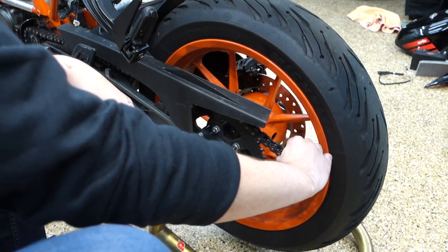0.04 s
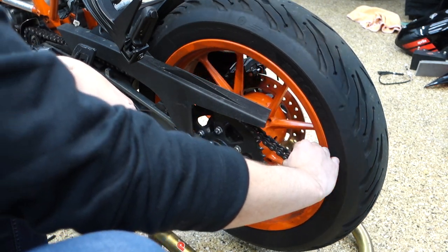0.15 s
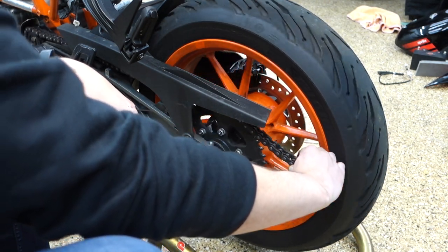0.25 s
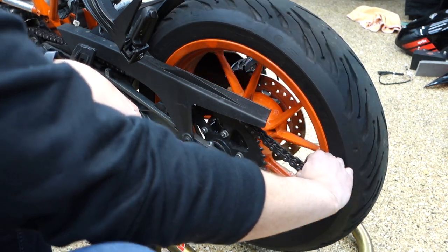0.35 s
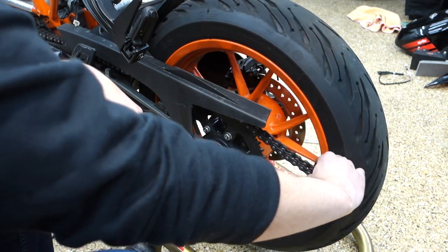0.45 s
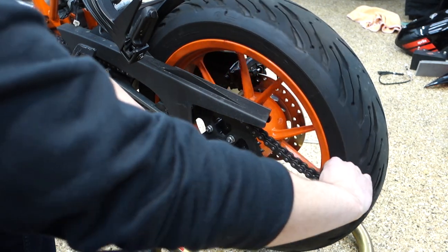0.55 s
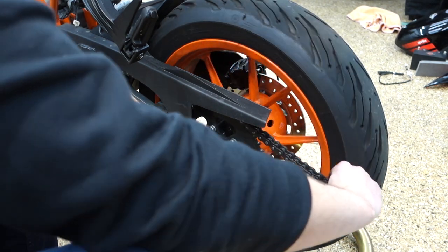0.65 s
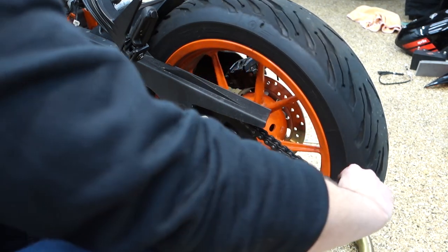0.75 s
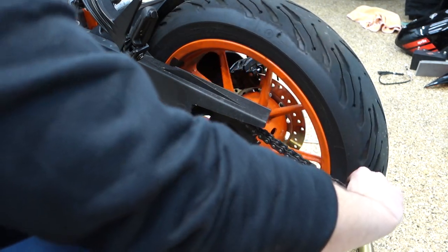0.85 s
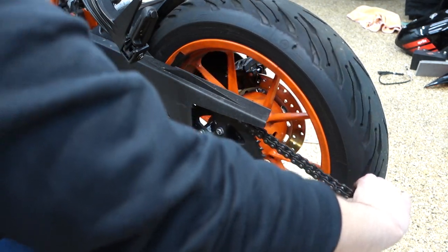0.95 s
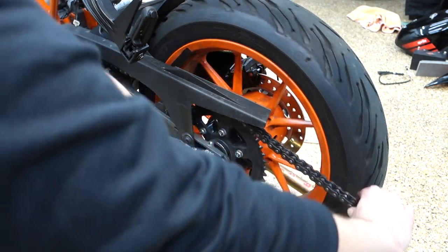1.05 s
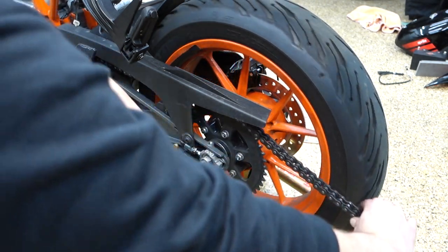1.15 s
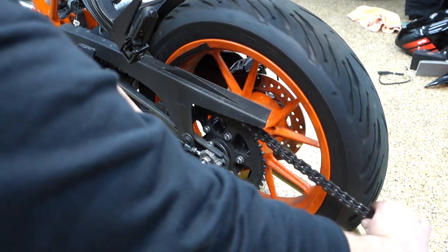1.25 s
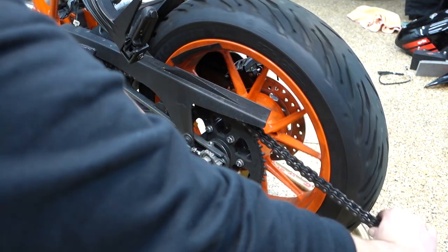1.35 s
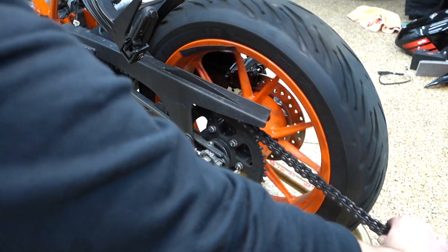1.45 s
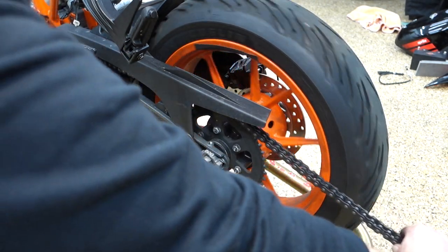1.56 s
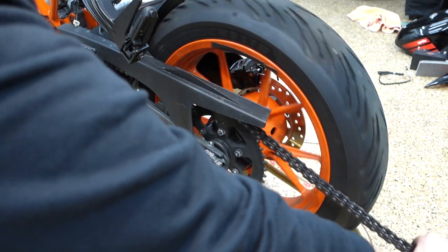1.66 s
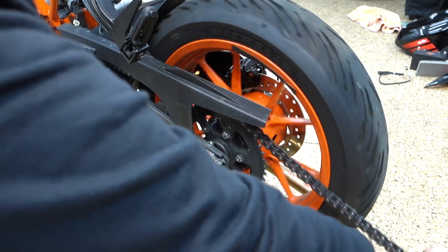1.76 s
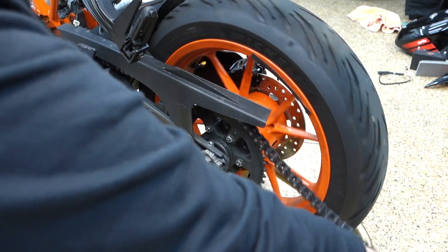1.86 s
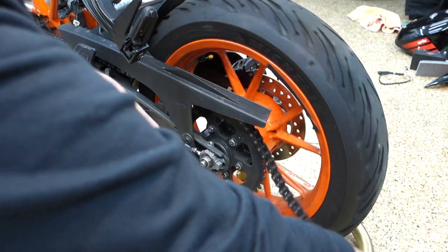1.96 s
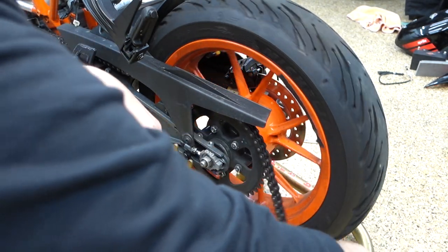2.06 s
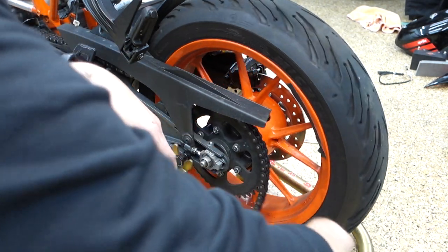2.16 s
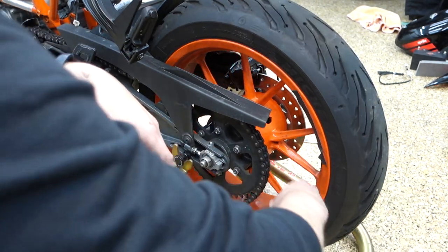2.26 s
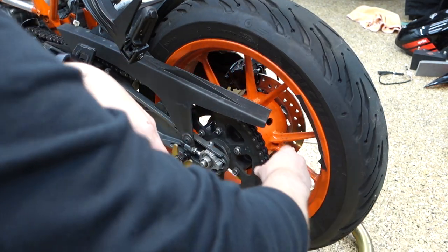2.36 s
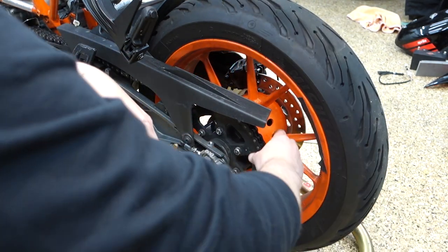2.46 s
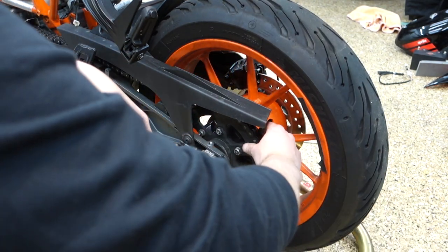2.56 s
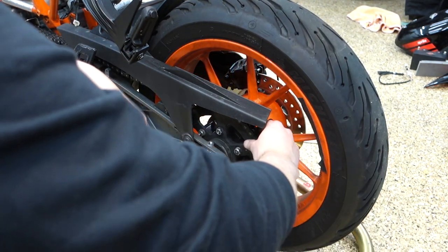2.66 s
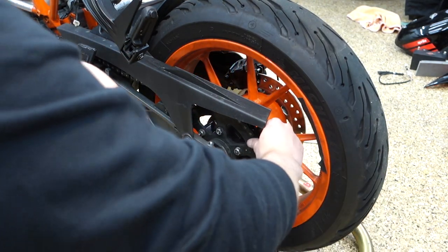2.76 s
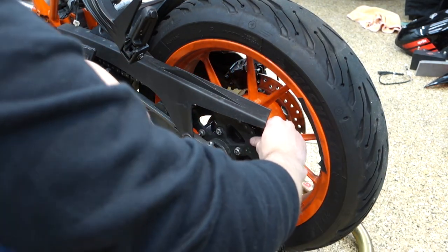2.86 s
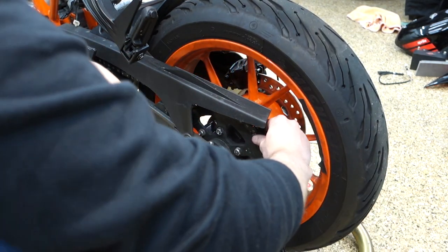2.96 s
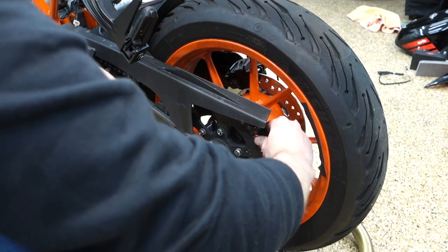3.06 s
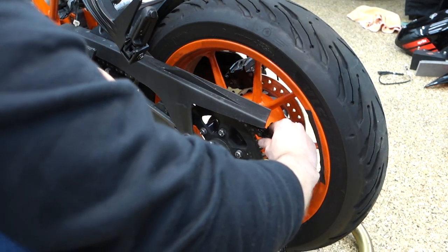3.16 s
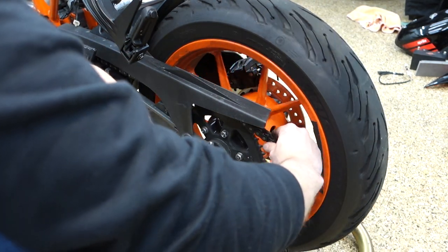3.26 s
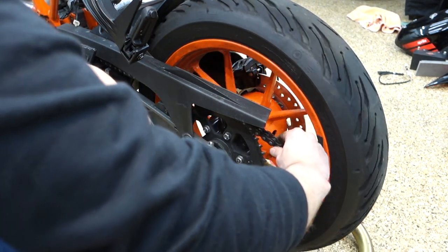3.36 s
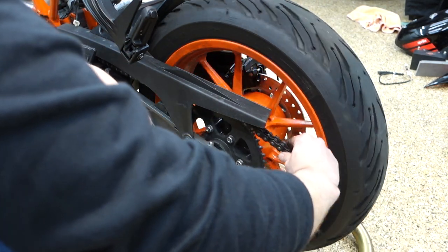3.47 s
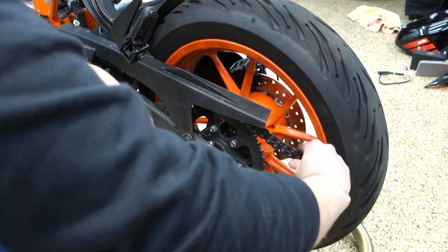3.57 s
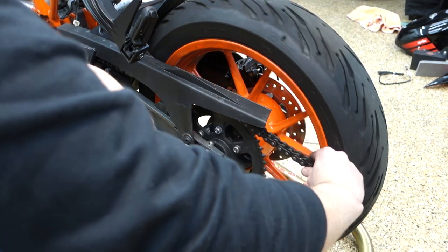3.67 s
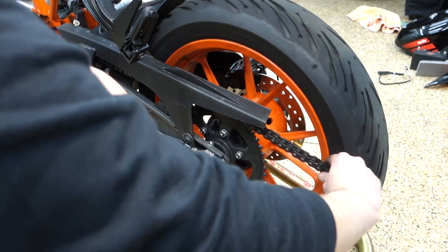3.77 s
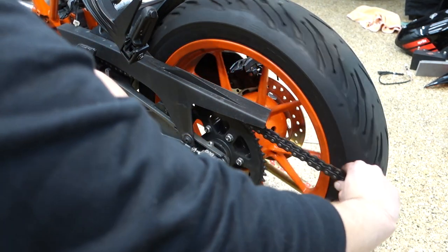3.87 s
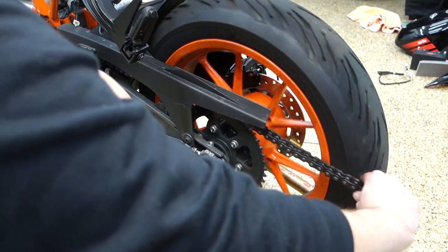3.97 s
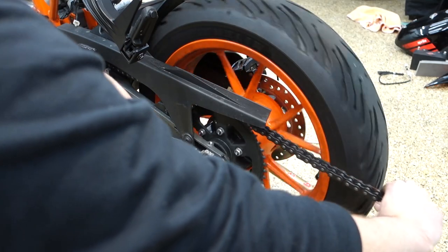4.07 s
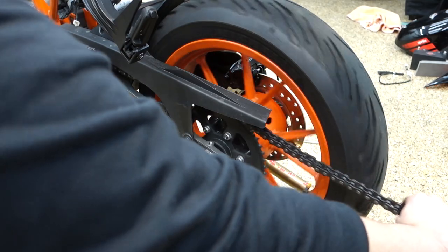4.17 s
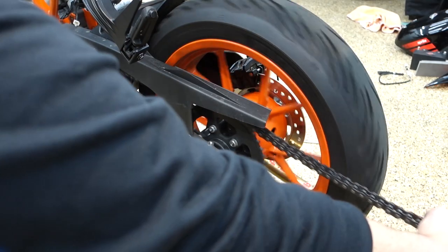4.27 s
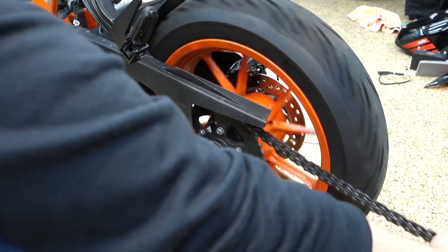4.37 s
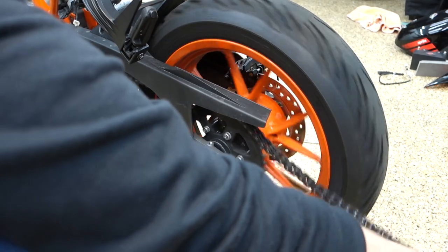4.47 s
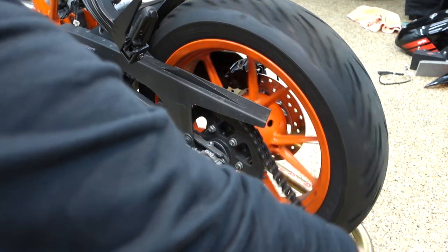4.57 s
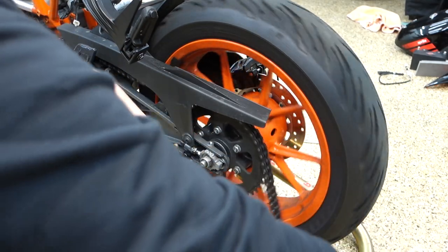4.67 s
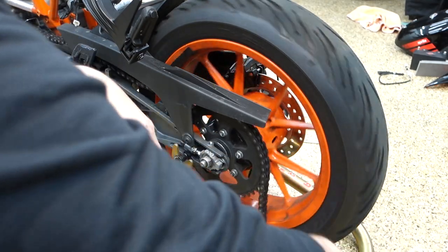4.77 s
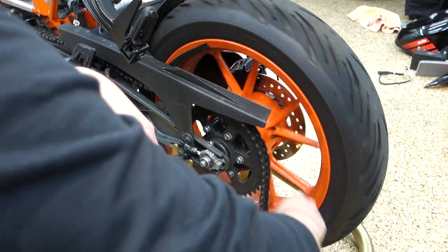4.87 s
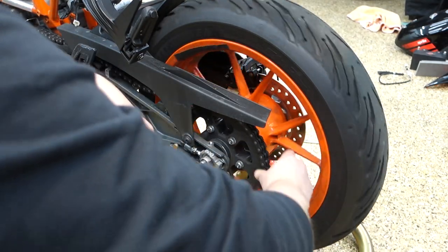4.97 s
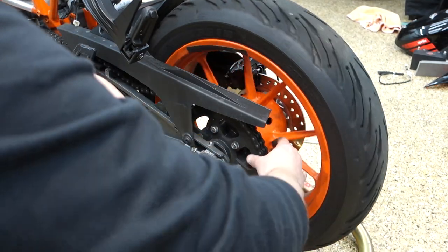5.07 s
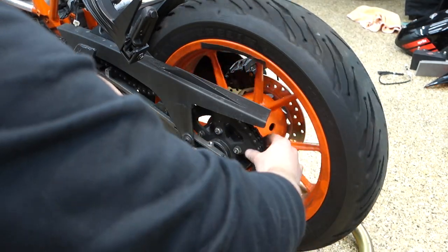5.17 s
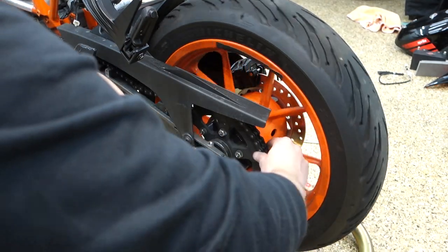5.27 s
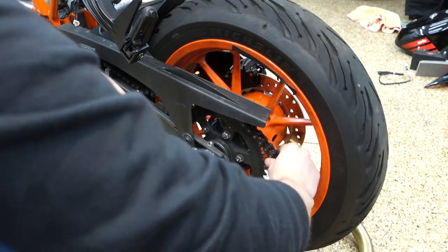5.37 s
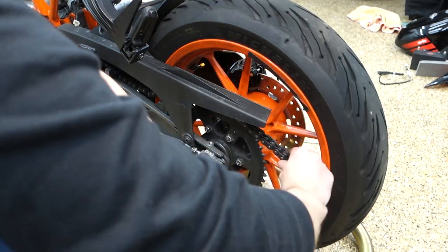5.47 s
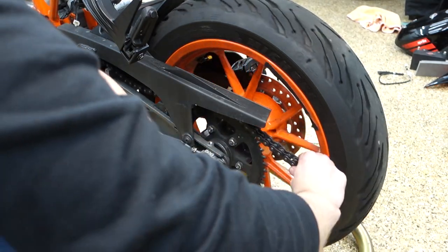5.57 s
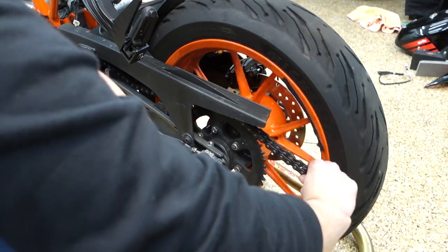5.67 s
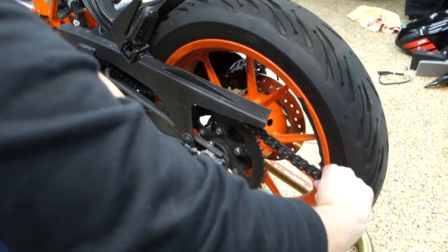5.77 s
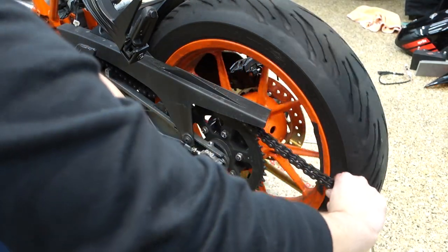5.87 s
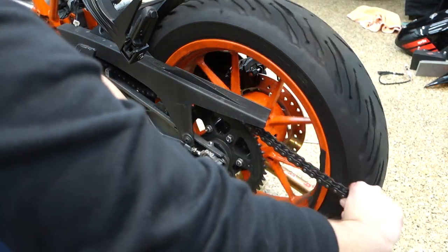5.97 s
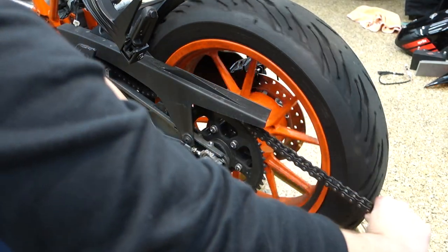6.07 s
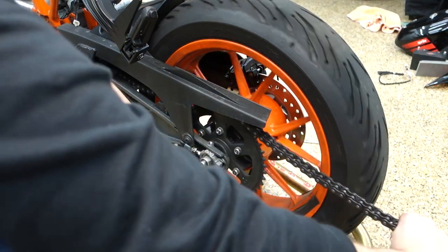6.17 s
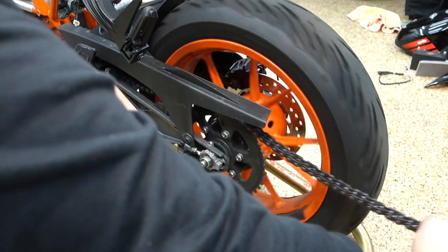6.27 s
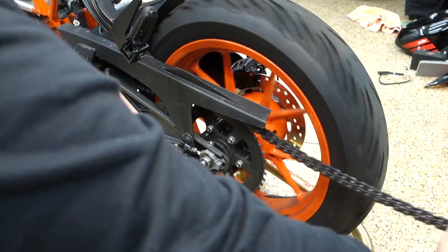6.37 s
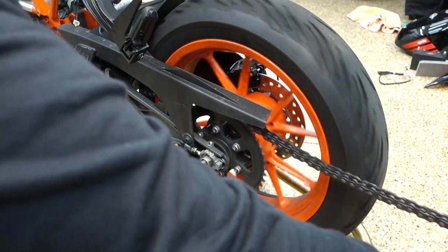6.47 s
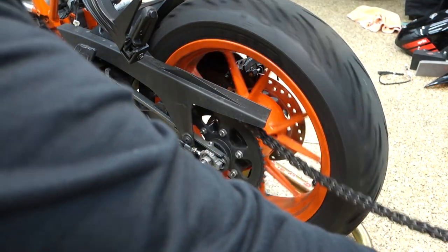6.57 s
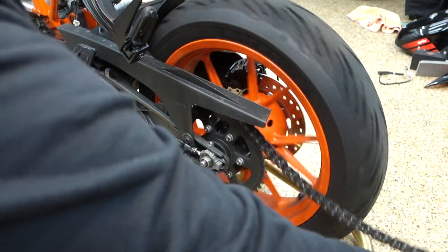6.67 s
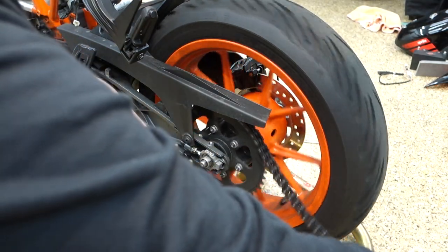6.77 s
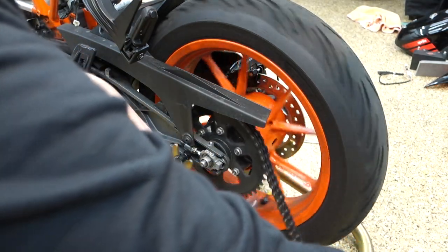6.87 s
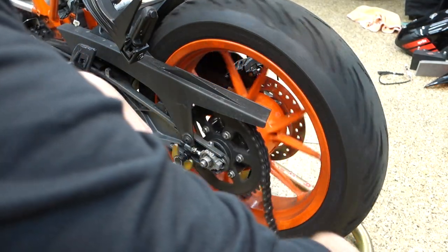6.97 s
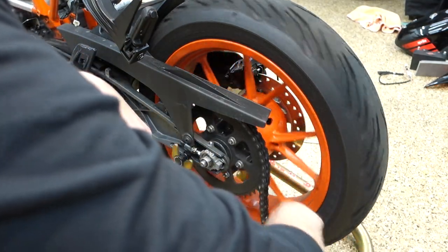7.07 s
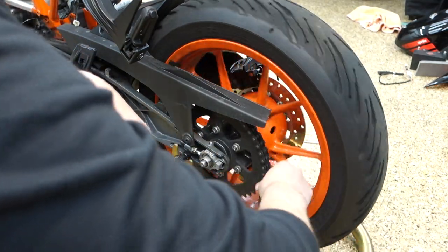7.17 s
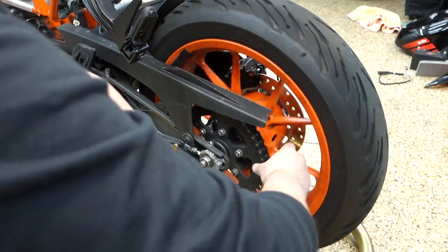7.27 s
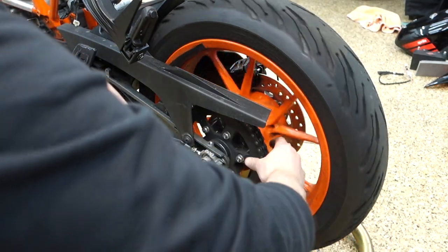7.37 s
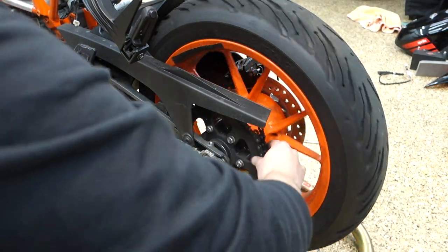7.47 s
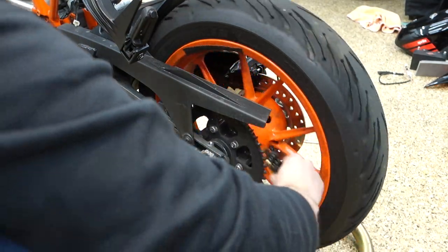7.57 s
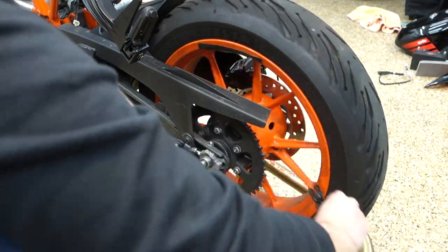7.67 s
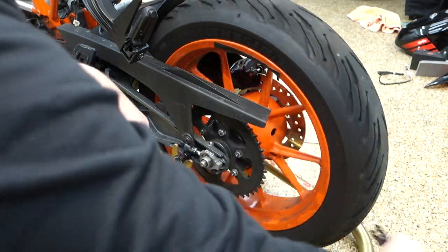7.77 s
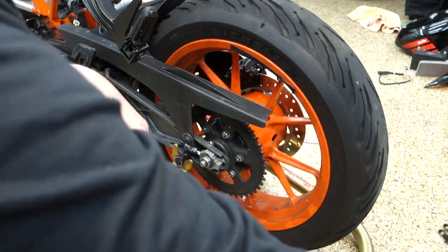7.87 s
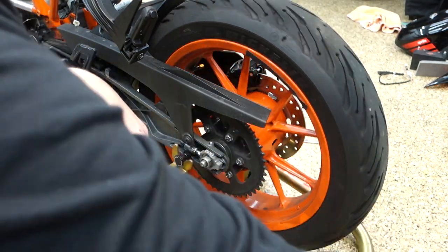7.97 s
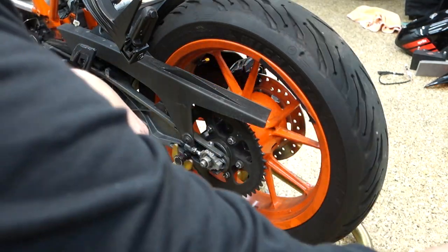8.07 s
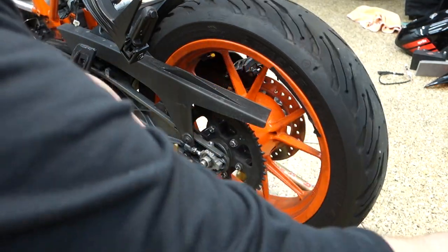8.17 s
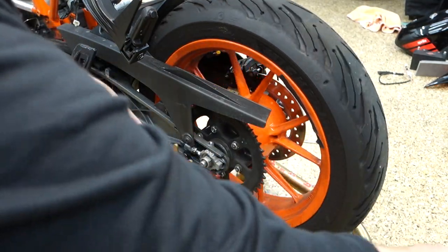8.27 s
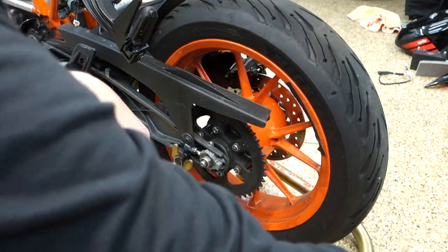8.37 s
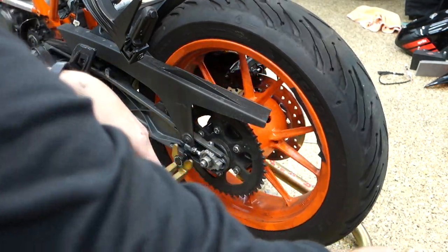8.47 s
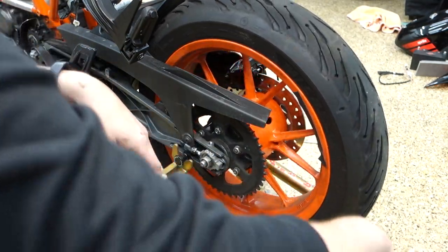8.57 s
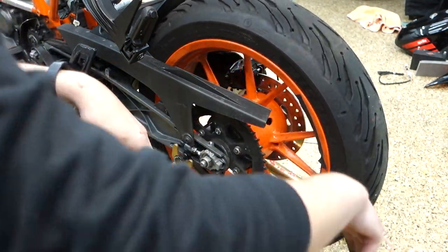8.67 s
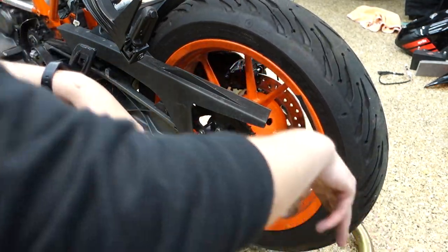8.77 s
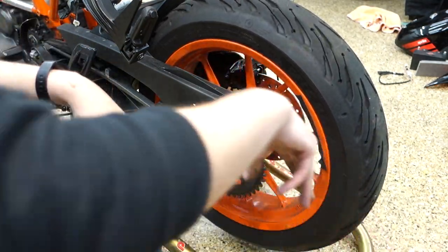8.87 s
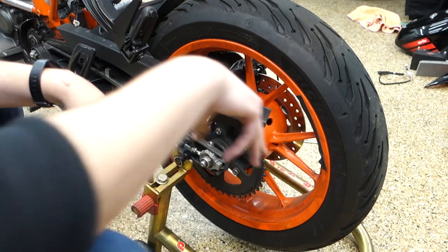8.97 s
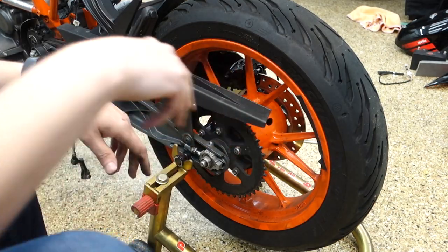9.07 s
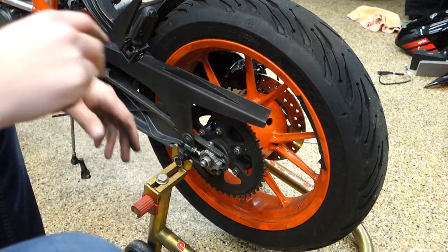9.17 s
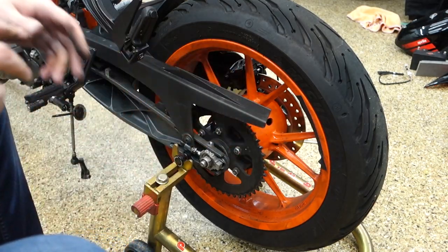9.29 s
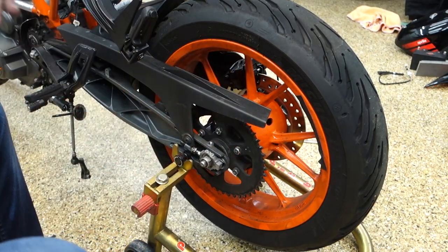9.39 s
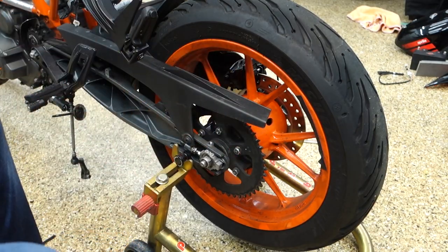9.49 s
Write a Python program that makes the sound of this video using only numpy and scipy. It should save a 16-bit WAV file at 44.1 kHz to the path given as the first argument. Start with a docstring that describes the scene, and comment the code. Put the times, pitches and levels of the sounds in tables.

```python
"""Garage: a loose motorcycle chain is pulled hand over hand off the rear sprocket.
Rollers rumble over the swingarm guide and links clink: random impacts excite decaying steel modes.
Slack loops hit the steel paddock stand or the sprocket, or spill onto concrete: tumbling blows, each
set to band levels. A fan hums as narrow noise bands over hiss; decaying noise makes the hard-walled room."""
import sys
import numpy as np
from scipy import signal
from scipy.fft import rfft, irfft, next_fast_len
from scipy.io import wavfile

SR = 44100
rng = np.random.default_rng(int(sys.argv[2]) if len(sys.argv) > 2 else 0)


def unload_wav(signal):
    """Save mono or channel-first audio to the path in sys.argv[1] as 16-bit WAV at rate SR, clipped to [-1, 1]."""
    wavfile.write(
        sys.argv[1],
        SR,
        np.round(np.clip(np.atleast_2d(signal).T, -1, 1) * 32767).astype(np.int16),
    )


N = 420273

# Loops landing on the sprocket. Each row: start in seconds, length of the clatter in seconds,
# then thud, clack, clink and sizzle levels in dB.
SPROCKET_HITS = [(6.136, 0.092, -38, -29.5, -24, -26.5), (6.218, 0.081, -37.5, -30.5, -24, -27)]
# Modes of links and sprocket teeth. Each row: frequency in Hz, relative level in dB, t60 in seconds.
LINK = [(1547, 2, 0.095), (3410, -10, 0.068), (4787, 15.5, 0.027), (4770, -9, 0.1), (5130, -27.5, 0.081),
        (6490, -9, 0.37), (6470, -5, 0.12), (6960, -2, 0.22), (7300, -13.5, 0.36), (8170, -3, 0.1),
        (8900, -12, 0.22), (10380, 1.5, 0.092), (10520, -33, 0.16), (12050, -3, 0.19), (13850, -7, 0.12),
        (14270, -2, 0.15)]
# Colour of a link contact. Each row: frequency in Hz, relative gain in dB.
CONTACT = [(30, -33), (130, -24.5), (200, -14), (290, 0), (450, 2.5), (700, 5), (1200, 14), (2500, 7.5),
           (3500, -3), (4900, -7.5), (6500, 1), (9000, 4.5), (15500, 6.5)]


def amp(db):
    """Decibels to gain."""
    return np.exp(np.asarray(db) * (np.log(10) / 20))


def unit(x):
    """Each channel at rms 1."""
    return x / np.sqrt(np.mean(x ** 2, axis=-1, keepdims=True) + 1e-20)


def along(points, hz):
    """Interpolate (Hz, value) points on a log frequency axis."""
    f, v = np.transpose(points)
    return np.interp(np.log(hz + 1), np.log(f + 1), v)


def seconds(length_s):
    """A time axis."""
    return np.arange(int(length_s * SR)) / SR


def filtered(x, response):
    """x through a zero-phase response of frequency."""
    size = next_fast_len(x.shape[-1] + 2048, real=True)
    gain = response(np.fft.rfftfreq(size, 1 / SR)).astype(np.float32)
    return irfft(rfft(x.astype(np.float32), size) * gain, size)[..., :x.shape[-1]]


def through(x, answer):
    """x convolved with an impulse response of one or two channels."""
    size = x.shape[-1]
    x = np.atleast_2d(x).astype(np.float32)
    answer = answer[:, :size].astype(np.float32)
    return signal.fftconvolve(x, answer, axes=1)[:, :size]


def coloured(x, gain):
    """x through a causal minimum-phase filter with the given gain of frequency."""
    size = 4096
    cepstrum = irfft(np.log(gain(np.fft.rfftfreq(size, 1 / SR)) + 1e-9))
    cepstrum[1:size // 2] *= 2
    cepstrum[size // 2 + 1:] = 0
    return through(x, irfft(np.exp(rfft(cepstrum)))[None])


def add(track, start_s, x):
    """Mix x into the track at start_s."""
    part = track[:, max(round(start_s * SR), 0):][:, :x.shape[1]]
    part += x[:, :part.shape[1]]


def contacts(count, rate_hz, spread_db):
    """Impacts at random moments, of random sizes and signs."""
    hit = rng.random(count) < rate_hz / SR
    size = amp(spread_db * np.clip(rng.standard_normal(count), -2, 2))
    return hit * rng.choice([-1, 1], count) * size


def struck(blows, modes, ring_db, crack_t60_s, split, count=2):
    """Every blow cracks as fresh noise and rings small groups of close steel modes."""
    t = seconds(.25)
    hz, db, t60_s = np.repeat(modes, count, axis=0).T[:, :, None]
    hz = hz * (1 + split * rng.standard_normal(hz.shape))  # no two links or contact points are alike
    phase = 2 * np.pi * (hz * t + rng.random(hz.shape))
    decay = np.exp((-np.log(1000) / t60_s * t).astype(np.float32))
    partials = np.sin(phase.astype(np.float32)) * decay
    ring = (amp(db).T * rng.choice([-1, 1], (2, len(hz)))) @ partials
    energy = through(blows ** 2, amp(-60 * t / crack_t60_s)[None] ** 2)
    crack = np.sqrt(abs(energy)) * rng.standard_normal((2, len(blows)))
    return unit(crack) + amp(ring_db) * unit(through(blows, ring))


def room(wet_db):
    """Direct sound plus a fresh noise tail, whose treble dies first."""
    # Garage decay. Each row: frequency in Hz, t60 in seconds.
    decay_points = [(200, 0.49), (600, 0.54), (1500, 0.52), (4000, 0.57), (9000, 0.42), (15000, 0.33)]
    hz, t, z = signal.stft(rng.standard_normal((2, SR // 2)), SR, nperseg=256)
    decay = amp(-60 * t / along(decay_points, hz)[:, None])
    build_up = 1 - np.exp(-t / 0.0014)
    tail = signal.istft(z * decay * build_up, SR, nperseg=256)[1]
    answer = amp(wet_db) * tail / np.linalg.norm(tail[0])
    answer[:, 0] += 1
    return answer


def voiced(x, colour, levels_db, attack_s):
    """Give a blow its hardness: the strength of thud, clack, clink and sizzle over its attack."""
    # Edges of thud, clack, clink and sizzle in Hz.
    edges = np.array([150, 900, 3000, 8000, 16000])
    head = x[:, :int(attack_s * SR)]
    power = 2 * np.mean(abs(rfft(head) / head.shape[1]) ** 2, axis=0)
    hz = np.fft.rfftfreq(head.shape[1], 1 / SR)
    centres = np.sqrt(edges[1:] * edges[:-1])
    gain_db = np.zeros(len(levels_db))

    def gain(f):
        return amp(along(colour, f) + along(np.transpose([centres, gain_db]), f))

    for _ in range(2):  # a smooth tilt couples neighbouring bands
        have = np.histogram(hz, edges, weights=power * gain(hz) ** 2)[0]
        gain_db = gain_db + levels_db - 10 * np.log10(have + 1e-20)
    return coloured(x, gain)


def clatter(hits, steel, colour, rate_hz, first_db, wet_db, attack_s=.03, size=SR * 3 // 5, count=5):
    """One link lands first and its neighbours tumble after it; steel(blows) answers the blows."""
    out, t = np.zeros((2, N)), np.arange(size) / SR
    tails = [room(wet_db) for _ in hits[:count]]
    for k, (start_s, length_s, *levels_db) in enumerate(hits):
        fade = np.exp(-np.minimum((t / length_s) ** 2, 20))
        blows = contacts(size, rate_hz, spread_db=2.5) * fade
        blows[0] = amp(first_db)
        wet = through(steel(blows), tails[k % count])
        add(out, start_s, voiced(wet, colour, levels_db, attack_s))
    return out


def swell(t, start_s, end_s, rise_db_per_s, fall_db_per_s):
    """A gain that rises to 1 at start_s, holds until end_s and falls away."""
    rise_db = rise_db_per_s * np.maximum(start_s - t, 0)
    fall_db = fall_db_per_s * np.maximum(t - end_s, 0)
    return amp(-rise_db - fall_db)


def effort():
    """Rumble, jingle, scrape and boom gains: a pull takes up slack, gathers speed and is let go."""
    # Strokes of the hand. Each row: start and end in seconds, then levels in dB at the end of the
    # stroke of roller rumble, link jingle, scrape and swingarm boom.
    pulls = np.array([(0.41, 0.597, -55, -56, -65.5, -86), (0.777, 1.105, -59, -60.5, -69, -82),
                      (1.46, 2.057, -50, -50.5, -60, -82), (3.582, 3.765, -47.5, -47.5, -56, -78),
                      (4.013, 4.596, -45, -44.5, -52.5, -63), (4.85, 5.972, -44.5, -57.5, -64, -60),
                      (6.4, 6.76, -43.5, -53, -65, -55.5), (7.252, 8.334, -61, -57.5, -82, -90),
                      (9.4, 9.53, -57, -56, -60.5, -82.5)])
    gather_db_per_s, take_up_db_per_s, let_go_db_per_s = 3.5, 54, 51
    shake_db, shake_delay_s = -25, 0.0066
    t = np.arange(0, N / SR, .002)
    strokes = np.array([swell(t, start_s, end_s, take_up_db_per_s, let_go_db_per_s)
                        * amp(-gather_db_per_s * np.maximum(end_s - t, 0))
                        for start_s, end_s in pulls[:, :2]])
    levels = np.sqrt(amp(pulls[:, 2:]).T ** 2 @ strokes ** 2)
    # blows on the sprocket shake the guide
    shake = swell(t - shake_delay_s, SPROCKET_HITS[0][0], SPROCKET_HITS[-1][0],
                  rise_db_per_s=900, fall_db_per_s=101)
    levels[0] += amp(shake_db) * shake
    return [np.interp(np.arange(N) / SR, t, level) for level in levels]


def running_chain(rumble, jingle):
    """Rollers bump over the swingarm guide while the side plates jingle."""
    # Modes of guide and rollers. Each row: frequency in Hz, relative level in dB, t60 in seconds.
    guide_modes = [(530.5, -2, 0.1), (654.5, -1, 0.13), (901, -6.5, 0.49), (1137, 6.5, 0.086),
                   (1246, 6, 0.089), (1296, -11, 0.11), (1593, -2, 0.2), (2190, -14, 0.072),
                   (6590, 13, 0.041), (8350, 18.5, 0.062)]
    # Colours of rollers and side plates. Each row: frequency in Hz, relative gain in dB.
    rumble_colour = [(40, -45), (140, -41), (210, -32), (290, -6), (450, -6), (650, 4.5), (1200, 4),
                     (1600, 6.5), (2200, -0.5), (3000, -0.5), (5000, -9), (8000, -17), (15500, -14.5)]
    jingle_colour = [(1500, -55.5), (3500, -4), (4900, 4.5), (6000, -3), (9000, 0), (12000, -4.5),
                     (15500, -1.5)]
    bumps = contacts(N, rate_hz=160, spread_db=4.0)
    rollers = struck(bumps, guide_modes, ring_db=-7.5, crack_t60_s=0.017, split=0.0139)
    rollers = through(rollers, room(wet_db=-0.5))
    rollers = unit(filtered(rollers, lambda hz: amp(along(rumble_colour, hz))))
    taps = contacts(N, rate_hz=53, spread_db=9.0)
    plates = struck(taps, LINK, ring_db=-20.0, crack_t60_s=0.015, split=0.0037)
    plates = through(plates, room(wet_db=5.0))
    plates = unit(filtered(plates, lambda hz: amp(along(jingle_colour, hz))))
    return rumble * rollers + jingle * plates


def hollow_scrape(centre_hz, width_hz):
    """Fine slips through one broad, low resonance."""
    slips = through(contacts(N, rate_hz=560, spread_db=3), room(wet_db=3.0))

    def resonance(hz):
        detune = (hz ** 2 - centre_hz ** 2) / ((hz + 1) * width_hz)
        return 1 / (1 + detune ** 2) ** 2

    return unit(filtered(slips, resonance))


def link_knocks():
    """Evenly spaced links knock over the swingarm guide, their level moving linearly in dB."""
    # Runs of knocks. Each row: start in seconds, length in seconds, levels in dB at start and end.
    runs = [(4.008, .11, -40.5, -33.5), (5.805, .11, -34, -29.5), (6.413, 0.13, -31.5, -19)]
    # Bass, ring and sizzle of a knock in dB against the middle.
    knock_colour_db = [-22, -14, -22.5]
    period_s = .0461
    knocks = []
    for start_s, length_s, first_db, last_db in runs:
        for s in np.arange(0, length_s, period_s):
            level_db = first_db + (last_db - first_db) * s / length_s
            knocks.append((start_s + s, level_db, *knock_colour_db))
    return knocks


def clinks(play_s):
    """A link clinks or knocks and chatters briefly in the play of its pin."""
    # Single clinks and knocks of chain links. Each row: start in seconds, reference level in dB,
    # then bass (before thud_share), ring and sizzle in dB against the middle.
    singles = [(0.159, -49.5, -14, 4, -9), (0.3566, -39, -29, -12, -21), (0.4542, -34, -29, -9.5, -26),
               (0.9188, -43, -23, -10, -18), (1.1677, -43.5, -26, -7, -19), (1.285, -33, -26, -5.5, -10),
               (1.4476, -31.5, -35, -3, -27), (1.696, -40.5, -39, -4.5, 0), (1.7943, -33, -38, -7, -26),
               (1.8666, -33.5, -25.5, -3, -12), (1.957, -25.5, -33, -12, -42),
               (2.6081, -43.5, -6.5, -0.5, 5), (2.7805, -44.5, -22, -8, -9),
               (2.9157, -46.5, -20.5, -33, -19), (3.2793, -48, -18, 1.5, -15), (3.4165, -43, -28, -6, -23),
               (3.4651, -41, -26, 1, -11), (3.5435, -33.5, -25, -3.5, -20), (3.6037, -34, -33, -3, -16),
               (3.7033, -27, -33, -5, -16), (3.9249, -42.5, -19, 9.5, -6), (4.3579, -34, -21, 0, -21),
               (4.4025, -33, -51, 4.5, -30), (4.4604, -31.5, -19, 2.5, 5), (4.5196, -24.5, -36, -11, -32),
               (4.6115, -28, -41, -16, -25), (4.9157, -25.5, -38, -11, -18), (5.1297, -27, -28, -15.5, -32),
               (5.3115, -36.5, -18, -7, -23), (5.3649, -27.5, -24, -11, -25), (5.5463, -27, -29, -5, -19),
               (5.6154, -32.5, -19.5, -21, -34), (5.9977, -27, -22, -12, -21), (6.0393, -24, -23, -6, -22),
               (6.0922, -23, -12.5, -18, -20), (6.5631, -24.5, -22, -1, -14),
               (6.5986, -24.5, -24, -15, -10.5), (6.647, -25, -21, -11, -20), (6.6829, -22, -18, -15, -17),
               (6.7342, -28, -28, -6, -23), (7.5423, -44, -33, -11, -15), (8.1312, -30, -33, -11, -14.5),
               (9.361, -46.5, -37, 3, -20), (9.4915, -40, -18, 0.5, -11.5)]
    # Thud, clack, clink and sizzle of a link in dB against its reference level.
    blow_db = [-6, -11, -4.5, -7]
    thud_share = 0.67  # how far the thud follows the bass
    hits = []
    for start_s, db, bass_db, ring_db, sizzle_db in list(singles) + link_knocks():
        levels_db = db + np.add(blow_db, [thud_share * bass_db, 0, ring_db, sizzle_db])
        hits.append((start_s, play_s, *levels_db))

    def link(blows):
        return struck(blows, LINK, ring_db=-9.5, crack_t60_s=0.012, split=0.0122)

    return clatter(hits, link, CONTACT, rate_hz=1400, first_db=-5, wet_db=1.5,
                   attack_s=.015, size=SR // 3)


def stand_hits():
    """Slack loops swing against the tubular steel stand and ring its modes."""
    # Loops landing. Each row: start in seconds, length of the clatter in seconds, then thud, clack,
    # clink and sizzle levels in dB.
    hits = [(2.133, 0.041, -56, -30, -26.5, -23.5), (2.172, 0.11, -49, -32, -25, -28.5),
            (4.127, 0.048, -54.5, -23, -25, -34.5), (4.742, 0.043, -47, -20, -24, -40),
            (4.762, 0.12, -53.5, -25.5, -25.5, -38.5)]
    # Modes of the steel tube. Each row: frequency in Hz, relative level in dB, t60 in seconds.
    modes = [(1165, -9, 0.22), (1193, 4.5, 0.23), (1762, 9.5, 0.15), (2140, -13, 0.41), (2323, 2.5, 0.15),
             (2475, 0.5, 0.3), (2920, 7.5, 0.089), (3870, -15, .4), (3940, 3, 0.15), (4090, 2, 0.4),
             (4632, 0.5, 0.32), (4940, 5.5, 0.21), (5010, -6, 0.244), (6030, 4.5, 0.15), (6550, 0.5, 0.31),
             (6707, -14, 0.29), (7220, 5.5, 0.17), (8130, 9.5, 0.11), (8850, 13.5, 0.16), (11300, -3, 0.3),
             (12500, -7, 0.27), (13600, 13, 0.11), (14650, 0, 0.091), (14960, 16, 0.16), (15375, 0, 0.13)]
    # Each row: frequency in Hz, relative gain in dB.
    colour = [(30, -28), (150, -27.5), (300, -10.5), (800, 0), (1150, 4), (1400, -4.5), (2500, 4.5),
              (3400, 0.5), (4200, 3.5), (6800, 5.5), (8400, -6.5), (12800, -12.5), (14300, -6),
              (15500, -5.5)]

    def tube(blows):
        return struck(blows, modes, ring_db=-3, crack_t60_s=0.025, split=0.00807, count=6)

    return clatter(hits, tube, colour, rate_hz=900, first_db=6.5, wet_db=-3.0)


def sprocket_hits():
    """Slack loops swing against the sprocket, ringing teeth and links."""
    def teeth(blows):
        return struck(blows, LINK, ring_db=-2, crack_t60_s=0.035, split=0.00826, count=6)

    return clatter(SPROCKET_HITS, teeth, CONTACT, rate_hz=750, first_db=11.5, wet_db=-5.5)


def floor_spills():
    """Links spill onto concrete: short cracks, hardly any ring."""
    # Loops landing. Each row: start in seconds, length of the clatter in seconds, then thud, clack,
    # clink and sizzle levels in dB.
    hits = [(4.665, 0.12, -45, -41, -32.5, -28.5), (6.849, 0.016, -42, -40, -33, -31),
            (6.933, 0.05, -67, -30, -28, -26.5), (6.949, 0.025, -41, -35, -36.5, -32.5),
            (7.919, 0.029, -59.5, -47, -34.5, -34), (8.404, 0.0058, -67, -79, -34, -35),
            (8.422, 0.02, -59.9, -46.5, -34, -28), (8.458, 0.065, -48.5, -38, -31.5, -37.5)]

    def concrete(blows):
        return struck(blows, LINK, ring_db=-36, crack_t60_s=0.0056, split=0.02)

    return clatter(hits, concrete, CONTACT, rate_hz=550, first_db=2, wet_db=2.0)


def singing_steel():
    """A light touch leaves a freely hanging steel part ringing in pure partials that swell, then die."""
    # Partials. Each row: frequency in Hz, level in dB before the swell, t60 in seconds.
    partials = [(1642, -44, 0.48), (2353, -44, 1.72), (3475, -33, 0.39), (4800, -39, 0.27),
                (10282, -76, .8), (12209, -79, .7), (13959, -74, .8)]
    out, t = np.zeros((2, N)), seconds(1)
    ring = sum(amp(db - 60 * t / t60_s) * np.sin(2 * np.pi * (hz * t + rng.random((2, 1))))
               for hz, db, t60_s in partials)
    onset = 1 - np.exp(-t / .002)
    slow_swell = 1 - 0.93 * np.exp(-t / 0.12)
    add(out, 7.628, ring * onset * slow_swell)
    return out


def garage_air(hiss_db):
    """Steady coloured hiss and the fuzzy tones of a fan, as narrow bands of noise."""
    # Fan tones. Each row: frequency in Hz, width in Hz, level in dB.
    fan_tones = [(118.9, 2.8, -103), (654, 47, -74), (717, 30, -74.5)]
    # Hiss colour. Each row: frequency in Hz, relative gain in dB.
    hiss_colour = [(50, -27), (120, -43.5), (200, -14.5), (350, -44), (550, -7), (900, -5), (1200, 10.5),
                   (1700, -3.5), (2200, 3), (3200, -4), (8000, -4.5), (15500, -2)]

    def noise(response):
        return unit(filtered(rng.standard_normal((2, N)), response))

    fan = sum(amp(db) * noise(lambda f: 1 / (1 + (2 * (f - hz) / width_hz) ** 2))
              for hz, width_hz, db in fan_tones)
    return fan + amp(hiss_db) * noise(lambda hz: amp(along(hiss_colour, hz)))


def microphones(pair):
    """Two close capsules share the bass; the treble differs between them and leans right."""
    # Each row: frequency in Hz, left-right likeness from 0 to 1.
    likeness = [(250, 1), (500, 0.98), (1000, 0.86), (2000, 0.6), (4000, 0.4), (8000, 0.06), (13000, 0.09)]
    # Each row: frequency in Hz, left minus right in dB.
    left_db = [(400, -0.5), (1000, 0), (2000, -1), (4000, -6), (8000, -5.5), (13000, -4.5)]

    def mid_side(hz):
        turn = np.arccos(np.clip(along(likeness, hz), -1, 1)) / 2
        return np.array([np.cos(turn), np.sin(turn)])

    def balance(hz):
        lean = np.arctan(amp(along(left_db, hz)))
        return np.sqrt(2) * np.array([np.sin(lean), np.cos(lean)])

    mid, side = filtered(pair, mid_side)
    return filtered(np.array([mid + side, mid - side]), balance)


def scene():
    """The chain runs out over guide, stand, sprocket and floor."""
    rumble, jingle, scrape, boom = effort()
    chain = running_chain(rumble, jingle) + clinks(play_s=0.0078)
    dragging = scrape * hollow_scrape(centre_hz=563, width_hz=364)
    dragging = dragging + boom * hollow_scrape(centre_hz=337.3, width_hz=257)
    landings = stand_hits() + sprocket_hits() + floor_spills()
    return microphones(chain + dragging + landings + singing_steel() + garage_air(hiss_db=-61.5))


def record(dry):
    """A steep low-pass sets the band limit."""
    top_hz = 15800
    return filtered(dry, lambda hz: 1 / (1 + (hz / top_hz) ** 200))


dry = scene()
out = record(dry)
unload_wav(out)
```